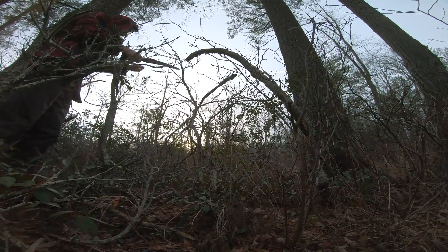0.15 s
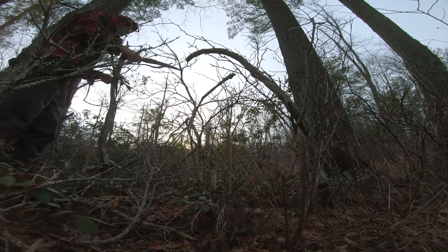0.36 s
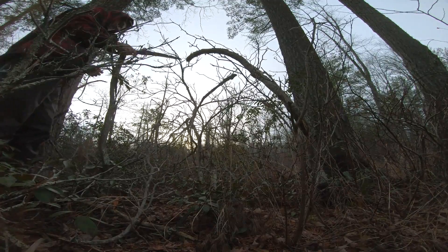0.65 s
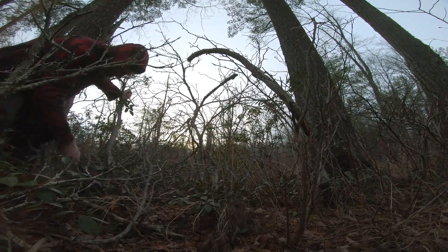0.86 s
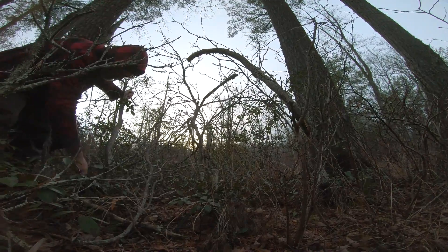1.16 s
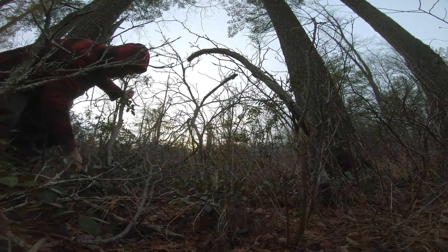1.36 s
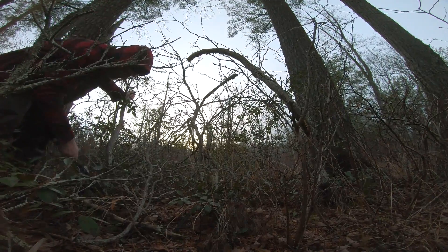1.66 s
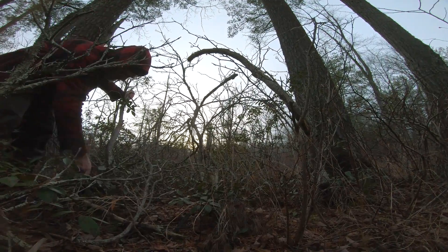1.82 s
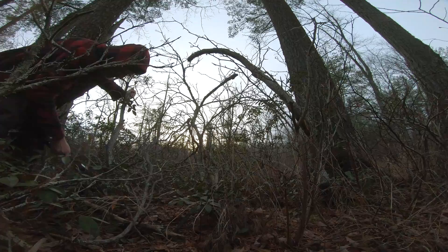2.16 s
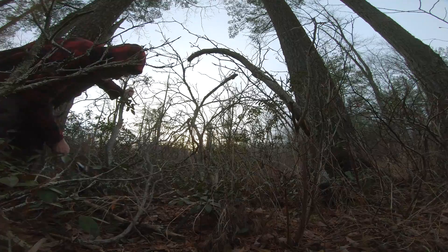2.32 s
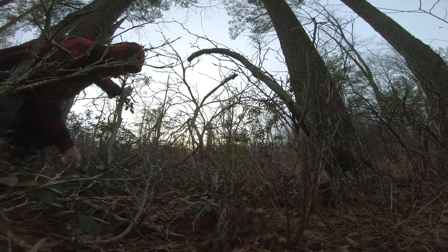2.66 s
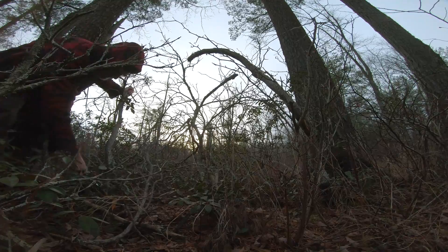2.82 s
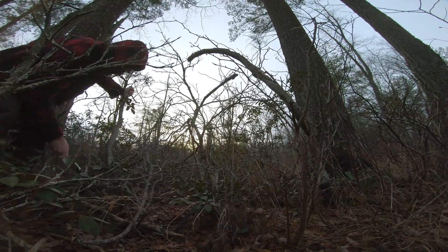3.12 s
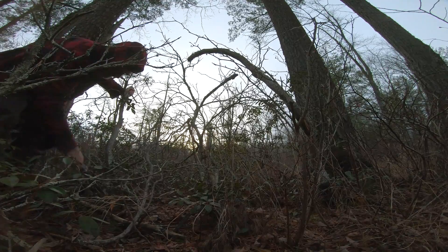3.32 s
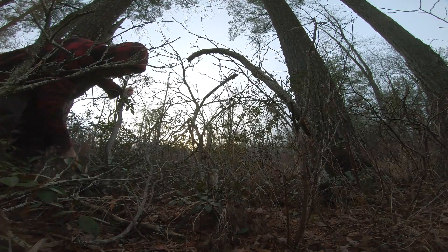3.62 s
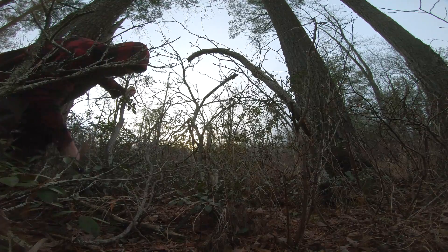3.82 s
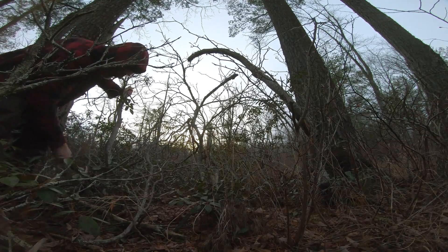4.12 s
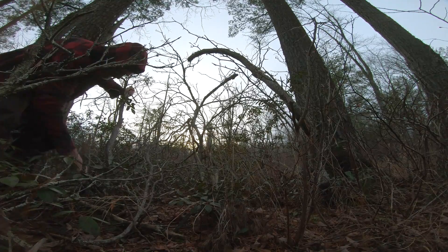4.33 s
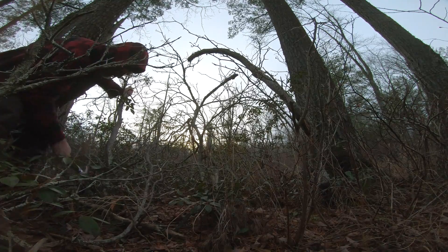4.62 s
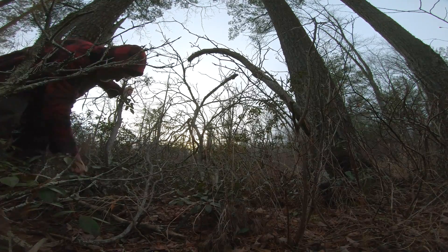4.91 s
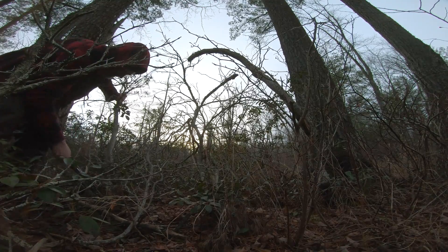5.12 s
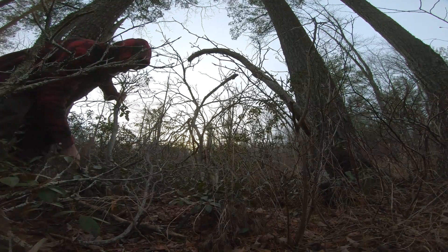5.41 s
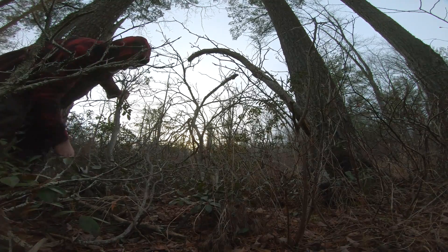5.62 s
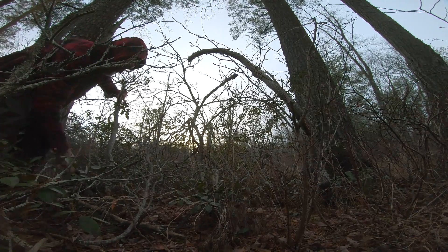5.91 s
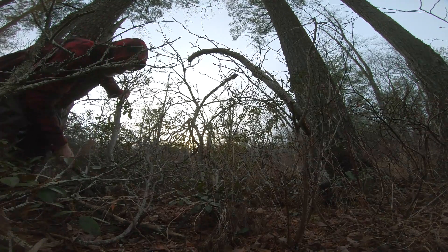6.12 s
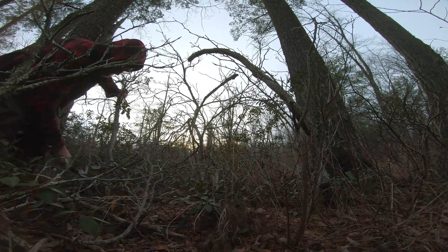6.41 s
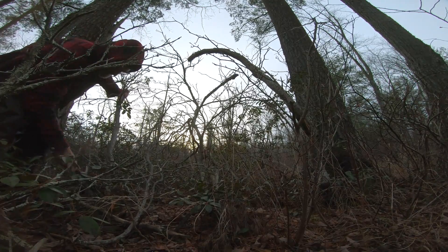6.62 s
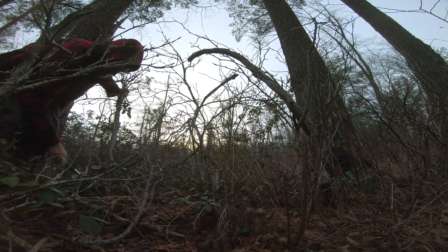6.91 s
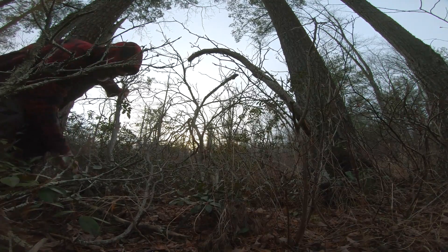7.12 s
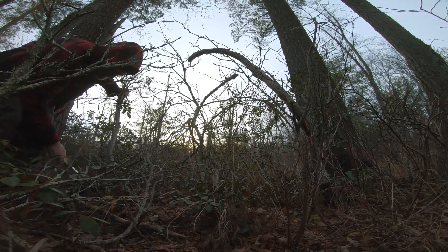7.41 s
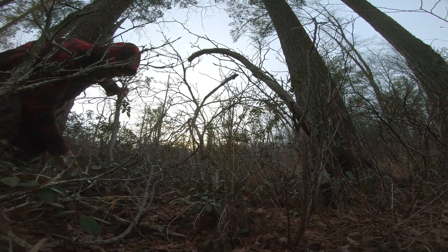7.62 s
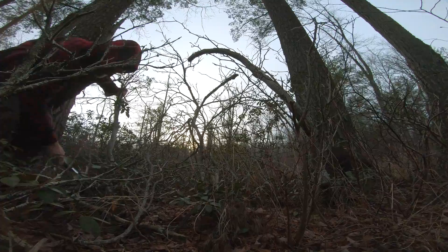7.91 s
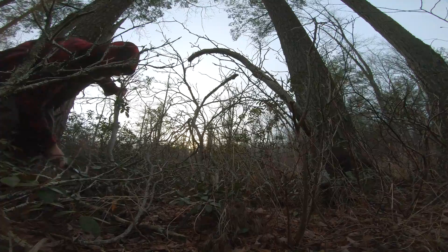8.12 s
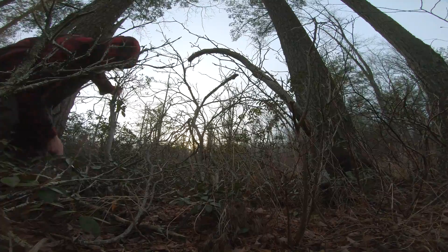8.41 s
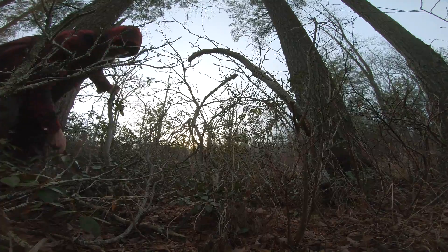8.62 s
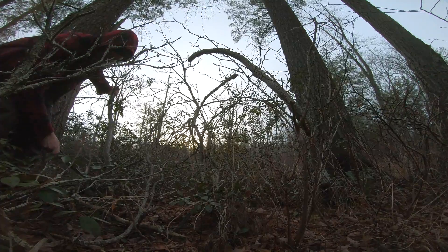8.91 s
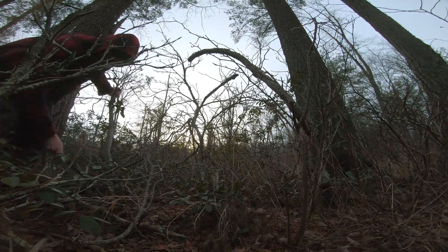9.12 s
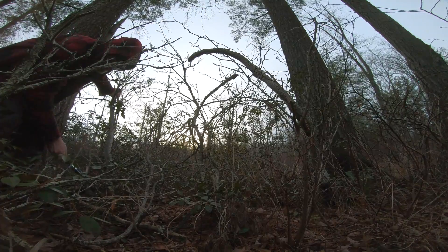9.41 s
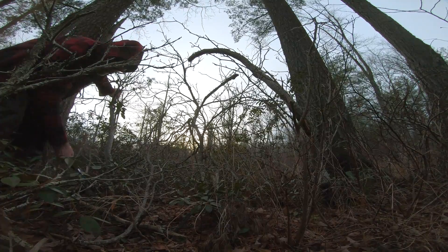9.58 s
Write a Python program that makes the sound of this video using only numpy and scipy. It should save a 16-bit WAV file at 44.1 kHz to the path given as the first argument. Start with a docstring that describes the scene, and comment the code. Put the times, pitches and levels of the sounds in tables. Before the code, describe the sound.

Dry, gritty hand sawing outdoors, heard very near and without noticeable echo. Heavy strokes tear brightly while lighter return strokes sound hollow and buzz with the teeth. Brittle twigs crack throughout, the stem jolts softly and the blade sometimes knocks with a brief metallic ring. After nearly eight seconds the sawing pauses for rustles, ticks and a stick dropping, then restarts briefly over a soft low woodland hush.

```python
"""Hand saw in a dead trunk

A folding hand saw works back and forth through a thin dead trunk in a quiet wood, close to the microphone.
Each tooth tears a burst of fibres, filtered noise that rings blade and wood. Twigs snap as short noise bursts,
the blade knocks as a sum of decaying modes, the stem jolts and a stick drops as damped low swings.
A soft hush of noise lies behind, and a gain control dips after the sharpest cracks."""
import sys
import numpy as np
from scipy import signal
from scipy.io import wavfile
from scipy.ndimage import uniform_filter1d

SR = 44100
rng = np.random.default_rng(int(sys.argv[2]) if len(sys.argv) > 2 else 0)


def convert_level_to_amplitude(level_db):
    """Map a level in decibels to its linear amplitude factor."""
    exponent = np.asarray(level_db, float) / 20
    return 10 ** exponent


def to_wav(s):
    """Save 16-bit WAV."""
    ch = np.atleast_2d(s).T  # columns
    pcm = np.round(np.clip(ch, -1, 1) * 32767)  # PCM
    wavfile.write(sys.argv[1], SR, pcm.astype(np.int16))


N = 429975
T = np.arange(N) / SR
MIDDLE_DB = -35  # tearing level of a stroke of middle effort


def evened(x):
    """Normalization: scales to rms 1."""
    return x / np.sqrt(np.mean(x ** 2) + 1e-20)


def wobble(seconds):
    """Low-pass random process: noise averaged twice over the given time, at rms 1."""
    size = round(seconds * SR)
    once = uniform_filter1d(rng.standard_normal(N), size)
    return evened(uniform_filter1d(once, size))


def colour(x, points):
    """Minimum-phase filtering: the log gain fixes the phase through the Hilbert transform, so nothing sounds early."""
    f, db = np.transpose(points)
    hz = abs(np.fft.fftfreq(32768, 1 / SR))
    gain_db = np.interp(np.log(hz + 1), np.log(f + 1), db)
    log_gain = np.log(convert_level_to_amplitude(np.maximum(gain_db, -100)))
    response = np.exp(np.conj(signal.hilbert(log_gain)))
    taps = np.fft.ifft(response).real[:12000]
    return signal.oaconvolve(x, taps)[:len(x)]


def grainy(x, patchy_db):
    """Time-varying filtering: knots and grain shift the colour in small quick patches, the blade's bend in longer ones."""
    z = signal.stft(x, nperseg=256, noverlap=192)[2]
    knots, bend = rng.standard_normal((2, *z.shape))
    knots = evened(uniform_filter1d(uniform_filter1d(knots, size=6, axis=0), size=14, axis=1))
    bend = evened(uniform_filter1d(uniform_filter1d(bend, size=3, axis=0), size=70, axis=1))
    patches = convert_level_to_amplitude(patchy_db * (knots + .7 * bend))
    return signal.istft(z * patches, nperseg=256, noverlap=192)[1][:N]


# saw strokes, one a row: (start [s], length [s], moment of hardest bite [share of length], tearing [dB],
#                          nominal fastest tooth rate [1/s], tooth hum against the tearing [dB])
SAW_STROKES = [(0.194, 0.34, 0.45, -31, 150, -25), (0.602, 0.3, 0.4, -45, 103, -5),
               (0.848, .18, 0.47, -34.5, 190, -11.5), (1.19, 0.36, 0.43, -28.5, 228, -12),
               (1.544, 0.26, 0.61, -34.5, 208, -28), (1.789, 0.38, 0.3, -24.5, 215, -17),
               (2.14, 0.062, .4, -34, 153, -20), (2.212, 0.15, 0.5, -35.5, 131, -14.5),
               (2.463, 0.32, 0.39, -36, 136, -9.5), (2.805, 0.27, 0.58, -27.5, 190, -12),
               (3.116, 0.33, 0.37, -39.5, 122, -22), (3.428, 0.25, 0.67, -29, 173, -9.5),
               (3.694, 0.25, .55, -33, 148, -9), (3.915, 0.24, 0.43, -23.5, 168, -15.5),
               (4.161, 0.22, 0.71, -37, 199, -7), (4.382, 0.21, 0.54, -25, 208, -22),
               (4.586, 0.28, 0.45, -37, 202, -4), (4.859, .19, 0.54, -28, 199, -14),
               (4.96, .155, 0.52, -27, 170, -14.5), (5.097, 0.24, 0.24, -38.5, 176, -6.5),
               (5.351, .217, 0.56, -39.5, 149, -14), (5.571, 0.26, 0.55, -38, 218, -5),
               (5.797, .22, 0.44, -21.5, 175, -15), (6.041, .24, 0.64, -36, 170, -7),
               (6.274, 0.22, 0.4, -20, 197, -20), (6.487, 0.21, 0.66, -32, 195, -4),
               (6.695, 0.23, 0.5, -27.5, 149, -6.5), (6.949, 0.27, 0.65, -34.5, 174, 0),
               (7.204, 0.26, 0.42, -25.5, 231, -15), (7.452, 0.25, 0.69, -34.5, 206, 1.5),
               (7.688, 0.25, 0.47, -22.5, 217, -14), (9.433, 0.19, 0.48, -45.5, 135, -9),
               (9.659, 0.19, 0.3, -38, 265, -1.5)]
# level of the rustle of blade and brush, with the gain control's dip near 8.6 s included: (time [s], level [dB])
RUSTLE = [(0, -51.5), (.19, -43.5), (.6, -43.5), (1.0, -51), (1.19, -54), (1.6, -54.5), (2.3, -49),
          (3.6, -52), (5, -49.5), (7.9, -51), (8.02, -52.5), (8.19, -52.5), (8.39, -53), (8.46, -62),
          (8.6, -75), (8.69, -56), (8.8, -59), (8.9, -66), (9.1, -53.5), (9.26, -66.5), (9.3, -54),
          (9.43, -58), (9.6, -48.5), (9.75, -31)]


def strokes():
    """Kinematics of the hand: tearing swells out of the rustle and sinks back, the tooth rate follows an arch."""
    rise_power, fall_power = 2.11, 1.82  # how flat-topped a stroke swells and dies away
    rest_db = np.interp(T, *np.transpose(RUSTLE))
    tear_db, effort_db = rest_db.copy(), np.full(N, float(MIDDLE_DB))
    rate, hum_db = np.full(N, 40.), np.full(N, -40.)  # between strokes
    for start, length, top, peak_db, top_hz, stroke_hum_db in SAW_STROKES:
        inside = slice(round(start * SR), round((start + length) * SR))
        u = (T[inside] - start) / length
        top = np.clip(top, .05, .95)
        rising = abs(1 - u / top) ** rise_power
        falling = abs((u - top) / (1 - top)) ** fall_power
        swell = 1 - np.where(u < top, rising, falling)
        swollen_db = rest_db[inside] + (peak_db - rest_db[inside]) * swell
        tear_db[inside] = np.maximum(tear_db[inside], swollen_db)
        rate[inside] = top_hz * (.2 + .8 * np.sin(np.pi * u))
        hum_db[inside], effort_db[inside] = stroke_hum_db, peak_db
    count = np.cumsum(rate * (1 + .06 * wobble(.006))) / SR  # teeth passed so far
    effort_db = uniform_filter1d(effort_db, size=2000) - MIDDLE_DB
    return tear_db, effort_db, count, uniform_filter1d(hum_db, size=400)


# trunk body and shaking against the tearing, at middle effort: (time [s], trunk [dB], shaking [dB])
BODY_LEVELS = [(0, 7.5, 2.5), (.3, -5, -8.5), (1, -7, -9), (1.4, -7, -5.5), (2.1, -7, -12),
               (2.8, -8.5, -10.5), (3.5, -8, -7), (4.5, -6, -10), (5.2, -5.5, -8.5), (6, -5.5, -1),
               (7.5, -3, -5.5), (8.2, -4.5, -7), (8.9, -3, -7.5), (9.7, -8, -7.5)]


def saw(tear_db, effort_db, count, hum_db):
    """Repeated-impact excitation: every tooth bites with a push and a puff of torn fibres, with cracks among them."""
    trunk_follows, shake_follows = 0.87, 0.6  # dB they gain for each dB of tearing
    s, trunk_db, shake_db = np.transpose(BODY_LEVELS)
    trunk_db = np.interp(T, s, trunk_db) + (trunk_follows - 1) * (tear_db - MIDDLE_DB)
    shake_db = np.interp(T, s, shake_db) + (shake_follows - 1) * (tear_db - MIDDLE_DB)

    # teeth are set left and right in turn, more unevenly heard in light strokes; each bites a little differently
    uneven = np.clip(0.38 - 0.05 * effort_db, 0, 1)
    tooth, phase = count.astype(int), count % 1
    tooth_gain = convert_level_to_amplitude(4.9 * rng.standard_normal(tooth[-1] + 1))
    bite = (1 + uneven * (-1.) ** tooth) * tooth_gain[tooth]

    puff = 0.89 + 0.54 * bite * np.exp(-phase / 0.65)
    crack_size = convert_level_to_amplitude(2.95 * np.minimum(rng.exponential(1, N), 5))
    cracks = (rng.random(N) < 1500 / SR) * crack_size * rng.choice([-1, 1], N)  # about 1500 per second
    grit = rng.standard_normal(N) + .5 * evened(cracks)
    fibres = evened(puff * convert_level_to_amplitude(1.01 * wobble(0.015)) * grit)
    ring = signal.oaconvolve(fibres, blade_ring(ring_share=1.0, spread_db=4))[:N]
    tear = evened(grainy(evened(tear_colour(fibres)) + .22 * evened(ring), patchy_db=2.4))

    push = bite * np.exp(-phase / 0.088)
    knock = 0.19 * evened(np.diff(push, prepend=0))
    trunk = evened(grainy(trunk_colour(knock + fibres), patchy_db=2.0))
    # light strokes sound hollow, heavy ones tight: low body over high
    low_body = signal.sosfilt(signal.butter(2, 1200, fs=SR, output="sos"), trunk)
    trunk = trunk + (convert_level_to_amplitude(1.5 - 0.33 * effort_db) - 1) * low_body

    hum = np.cos(2 * np.pi * count) + 0.3 * np.cos(4 * np.pi * count)
    hum = hum + 0.77 * uneven * np.cos(np.pi * count)  # left-right pairs, an octave down
    sawing = tear + convert_level_to_amplitude(hum_db + 2.8 * wobble(0.015)) * hum
    return convert_level_to_amplitude(tear_db) * sawing + convert_level_to_amplitude(tear_db + trunk_db) * trunk + convert_level_to_amplitude(tear_db + shake_db) * shaking()


# colour of torn fibres: (frequency [Hz], relative filter gain [dB])
TEAR_COLOUR = [(1760, -56), (3000, -12.5), (3780, -2.5), (4310, -1), (4990, 3.5), (5430, 2), (5860, 2),
               (7280, -4), (8430, -4), (12500, -4), (14700, -3), (15500, -9), (15900, -82)]


def tear_colour(x):
    """Source-filter principle: gives a noise the bright spectrum of tearing fibres."""
    return colour(x, TEAR_COLOUR)


# modes of the steel blade: (frequency [Hz], mean relative level [dB], free ring time to -60 dB [s])
BLADE_MODES = [(4936, 0, 0.084), (6428, -3, 0.047), (7311, -22, 0.079), (9469, -20, 0.08),
               (9938, -7, 0.035), (10360, -10, 0.048), (10780, -10, 0.041), (12910, -17, 0.09),
               (13630, -6, 0.032)]


def blade_ring(ring_share, spread_db):
    """Modal superposition, peak 1: the wood shortens the steel's ring, the spot struck shifts the balance."""
    t = np.arange(SR // 6) / SR
    share = np.clip(ring_share, .1, 1)  # of the free ring time
    hz, db, t60 = np.transpose(BLADE_MODES)[:, :, None]
    struck_db = db + spread_db * rng.standard_normal(db.shape)
    decay = convert_level_to_amplitude(struck_db - 60 * t / (share * t60))
    ring = (decay * np.sin(2 * np.pi * hz * t)).sum(0)
    return ring / abs(ring).max()


# resonances of the trunk: (frequency [Hz], relative filter gain [dB])
TRUNK_COLOUR = [(130, -18), (220, 4), (306, 5), (673, 6.5), (850, 5), (1010, 7), (1460, 3), (1830, 5),
                (2360, 3.5), (2800, -6), (3640, -6.5), (6160, -120)]


def trunk_colour(x):
    """Forced resonance: the wooden body answers whatever drives it with its own spectrum."""
    return colour(x, TRUNK_COLOUR)


# shaking of stem and ground: (frequency [Hz], relative filter gain [dB])
SHAKE_COLOUR = [(8.2, -46), (14, -4), (65, 2), (200, -7), (260, -31), (440, -120)]


def shaking():
    """Random vibration: low-frequency noise of stem and ground, at rms 1."""
    return evened(colour(rng.standard_normal(N), SHAKE_COLOUR))


def crackle(tear_db):
    """Poisson-like chance events: small snaps ride on the tearing, in rows like those of the snap table."""
    per_s, over_db = 10, 8.5  # over_db: the largest snap over the tearing
    when, size, tone, ring = rng.random((round(per_s * N / SR), 4)).T
    s = when * (N - 1) / SR
    db = np.interp(s, T, tear_db) + over_db - 8 * size
    return np.transpose([s, db, 3500 * 2.5 ** tone, 0.0042 + 0.027 * ring])


# snaps of twigs and fibres: (time [s], burst level [dB], centre [Hz],
#                             decay to -60 dB [s], held within 0.002 to 0.06)
TWIG_SNAPS = [(0.093, -23.5, 3720, 0.012), (0.126, -26, 11665, 0.008), (0.1499, -23.5, 3200, 0.01),
              (0.778, -19, 5970, 0.0042), (0.869, -18.5, 5700, 0.038), (0.9424, -10, 11900, 0.0051),
              (0.9426, -27, 1500, 0.01), (1.0559, -34, 11192, 0.017), (1.105, -35, 6120, 0.006),
              (1.237, -2, 10950, 0.0032), (1.7283, -7, 11100, 0.0054), (1.8262, -21, 4840, 0.014),
              (1.8995, -16, 4594, 0.016), (1.9775, -10, 10510, 0.011), (2.0301, -15, 5559, 0.013),
              (2.1633, -23, 12611, 0.045), (2.165, -31.5, 1804, 0.03), (2.39, -25.5, 6560, 0.0062),
              (2.5492, -23.5, 6100, 0.022), (2.6036, -23, 6376, 0.0077), (2.7047, -28, 1208, 0.0087),
              (2.969, -9.5, 13660, 0.017), (3.8801, -18.5, 4430, 0.0062), (4.507, -9, 5000, 0.0047),
              (4.5273, -14.5, 5230, 0.014), (4.8925, -29.5, 3913, 0.029), (4.939, -10.5, 5470, 0.022),
              (4.9555, -11.5, 4100, 0.0093), (4.973, -9, 4484, 0.011), (5.0492, -15.5, 5547, 0.016),
              (5.7431, -25, 9050, 0.012), (5.8175, -20.5, 8250, 0.026), (5.8369, -7.5, 13940, 0.018),
              (5.846, -6, 7980, 0.0086), (5.8767, -14, 8440, 0.06), (6.2986, -25, 8150, 0.017),
              (6.3186, -9, 7850, 0.0046), (6.6554, -19, 1345, 0.007), (6.6717, -16.5, 1648, 0.005),
              (6.8341, -18, 6047, 0.03), (6.9968, -29.5, 6250, 0.028), (7.0693, -26, 11190, 0.013),
              (7.1132, -24, 11620, 0.011), (7.3656, -5, 6032, 0.016), (7.377, -10.5, 9343, 0.019),
              (7.5047, -22.5, 6710, 0.018), (7.571, -12.5, 6700, 0.014), (7.6039, -14.5, 5924, 0.037),
              (7.8746, -16.5, 11810, 0.022), (7.946, -21, 8870, 0.026), (8.053, -39, 5260, 0.0098),
              (8.0603, -36, 8470, 0.0076), (8.141, -33.5, 6170, 0.018), (8.1487, -32.5, 8890, 0.025),
              (8.3227, -33, 5320, 0.019), (8.4074, -25.5, 6840, 0.021), (8.498, -41, 800, 0.013),
              (8.5487, -6, 5470, 0.0038), (8.5628, -15.5, 14900, 0.0054), (8.7686, -31, 3630, 0.0071),
              (8.795, -37, 3790, 0.022), (8.834, -17.5, 3882, 0.0095), (8.8402, -27, 3796, 0.018),
              (8.8696, -29.5, 6320, 0.01), (8.8873, -36, 4140, 0.0086), (8.93, -32.5, 5220, 0.012),
              (9.0008, -38, 3830, 0.0053), (9.1532, -35, 3780, 0.007), (9.3857, -33.5, 5180, 0.0083),
              (9.5012, -24, 5914, 0.029), (9.6065, -27.5, 3098, 0.0089), (9.7, -14, 5246, 0.013),
              (9.7049, -19.5, 5040, 0.068)]
# how much of a snap passes into the wood under it: (frequency [Hz], filter gain [dB])
SNAP_INTO_WOOD = [(900, 2.5), (3000, -13.5), (9000, -23)]


def snaps(tear_db):
    """Impulsive fracture: short noise bursts, strongest round their centre, drive the wood and bounce off the ground."""
    rows = np.vstack([TWIG_SNAPS, crackle(tear_db)])
    out, t = np.zeros(N + SR), np.arange(SR // 6) / SR
    for s, db, hz, t60 in rows:
        burst = rng.standard_normal(len(t))
        core, skirt = (np.clip([hz / ratio, hz * ratio], 200, SR / 2.2) for ratio in (1.25, 3.5))
        ringing = evened(signal.lfilter(*signal.butter(1, core, "band", fs=SR), burst))
        band = ringing + 0.13 * evened(signal.lfilter(*signal.butter(2, skirt, "band", fs=SR), burst))
        shape = convert_level_to_amplitude(-60 * t / np.clip(t60, .002, .06)) * np.minimum(t / .0006, 1)  # 0.6 ms attack
        out[round(s * SR):][:len(t)] += convert_level_to_amplitude(db) * band * shape
    out += trunk_colour(colour(out, SNAP_INTO_WOOD))
    out += 0.22 * np.roll(out, round(0.0044 * SR))  # ground bounce, 4.4 ms later
    return out[:N]


# blade knocked hard enough to ring: (time [s], peak [dB], share of the free ring time [0-1], at least 0.1 used)
BLADE_KNOCKS = [(4.5294, 0.5, 0.02), (7.3657, -8.5, 0.8), (7.5048, -39, 0.35), (7.5708, -8, 0.33),
                (7.6051, -19, 0.21), (8.406, -15.5, 0.88), (9.3851, -33, 0.6), (9.5019, -15, 0.24),
                (9.5236, -18, 0.31), (9.705, -7.5, 0.45)]


def knocks():
    """Impact excitation of modes: each blow in the cut sets the blade ringing."""
    out = np.zeros(N + SR)
    for s, db, ring_share in BLADE_KNOCKS:
        ring = blade_ring(ring_share, spread_db=2.5)
        out[round(s * SR):][:len(ring)] += convert_level_to_amplitude(db) * ring
    return out[:N]


# the stem jolts as the teeth catch: (time [s], envelope peak [dB], frequency [Hz])
STEM_JOLTS = [(1.264, -26, 84.1), (1.377, -29, 84.4), (1.442, -28.5, 80.1), (1.826, -29, 50.84),
              (2.824, -33.5, 56), (2.975, -32.5, 80.6), (3.495, -32.5, 94.4), (3.939, -27.5, 67.14),
              (4.402, -33, 66.9), (4.881, -40, 40.25), (5.041, -31, 37.3), (5.198, -41, 37.04),
              (5.843, -20.5, 67.05), (6.311, -29, 55), (7.246, -25.5, 58.9), (7.716, -30, 53.97),
              (9.711, -24.5, 110.8)]


def jolts():
    """Damped oscillation: the stem swings up and dies away within a few periods."""
    out, t = np.zeros(N + SR), np.arange(SR // 6) / SR
    for s, db, hz in STEM_JOLTS:
        swing = hz * t / 1.25  # about three swings of the stem
        envelope = np.e * swing * np.exp(-swing)
        out[round(s * SR):][:len(t)] += convert_level_to_amplitude(db) * envelope * np.sin(2 * np.pi * hz * t)
    return out[:N]


# a stick drops on the ground by the microphone: (time [s], envelope level at onset [dB], decay to -60 dB [s])
STICK_THUD = 8.5488, -22, 0.029


def thud():
    """Damped impulse: a one-sided push that rocks back at a falling pitch."""
    s, db, t60 = STICK_THUD
    t = np.maximum(T - s, 0)
    return convert_level_to_amplitude(db - 60 * t / t60) * np.sin(2 * np.pi * 22 * t ** .6)


# colour of the hush: (frequency [Hz], relative filter gain [dB])
HUSH_COLOUR = [(10, -9), (22, 2), (34, -5.5), (60, -15), (115, -8.5), (160, -27.5), (250, -16),
               (400, -29.5), (1000, -26), (1900, -36), (2900, -40.5), (4500, -41), (7000, -48),
               (10000, -38.5), (15900, -56)]
# level of the hush, turned down briefly by the gain control in the pause: (time [s], level [dB])
HUSH_LEVEL = [(0, -42), (1, -46.5), (8.3, -44.5), (8.45, -53), (8.62, -48), (8.72, -43.5), (9.2, -45),
              (9.75, -46)]


def wood_air():
    """Stationary noise, slowly modulated: the soft hush of the open wood with faint leaf-litter ticks."""
    tick_size = convert_level_to_amplitude(4.5 * np.minimum(rng.exponential(1, N), 4))
    ticks = (rng.random(N) < 120 / SR) * tick_size  # about 120 per second
    hush = evened(grainy(colour(rng.standard_normal(N), HUSH_COLOUR), patchy_db=1.5))
    hush = hush * convert_level_to_amplitude(2.1 * wobble(0.12))
    litter = convert_level_to_amplitude(-56) * grainy(tear_colour(ticks), patchy_db=5)
    return convert_level_to_amplitude(np.interp(T, *np.transpose(HUSH_LEVEL))) * hush + litter


def scene():
    """Linear superposition: saw, snaps, knocks, jolts, thud and air add at one microphone."""
    motion = strokes()
    tear_db = motion[0]
    mix = saw(*motion) + snaps(tear_db) + knocks() + jolts() + thud() + wood_air()
    return mix[None]


def roll_off(x):
    """The treble ends steeply here."""
    return signal.sosfilt(signal.butter(12, 16970, fs=SR, output="sos"), x)


def record(dry):
    """Dynamic-range compression: the gain dips after sharp peaks and recovers steadily; then a low-pass band limit."""
    power_db = 10 * np.log10(abs(uniform_filter1d(dry[0] ** 2, size=40)) + 1e-12)
    fall = T * 72.0  # the held peak sinks 72 dB per second
    held_db = np.maximum.accumulate(power_db + fall) - fall
    over_db = np.maximum(held_db + 26.5, 0)  # threshold -26.5 dB
    lagged_db = signal.lfilter([.002], [1, -.998], over_db)  # lag of about 11 ms
    ducked = dry / convert_level_to_amplitude(0.24 * lagged_db)
    low_pass = signal.firwin(511, 16100, window=("kaiser", 9), fs=SR)  # edge in Hz
    mix = signal.oaconvolve(ducked, low_pass[None], "same")
    return roll_off(mix)


dry = scene()
out = record(dry)
to_wav(out)
```